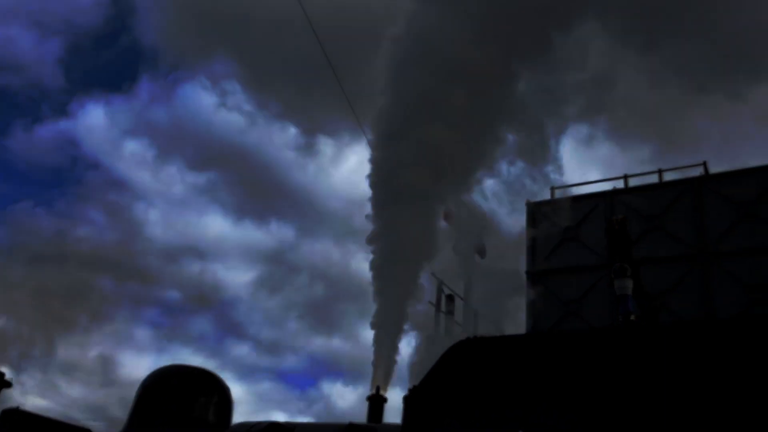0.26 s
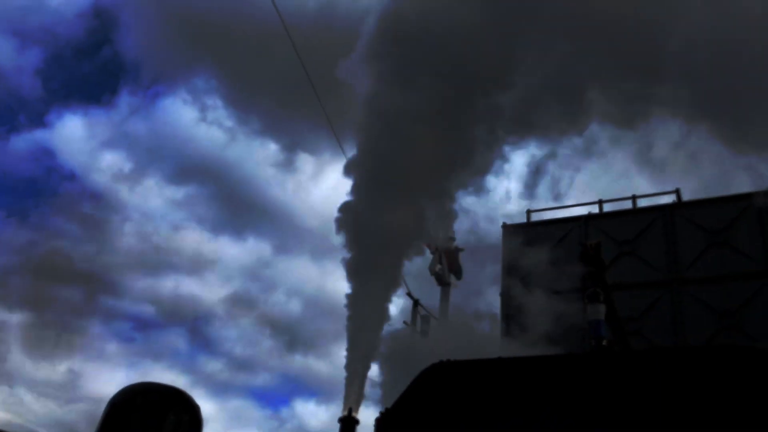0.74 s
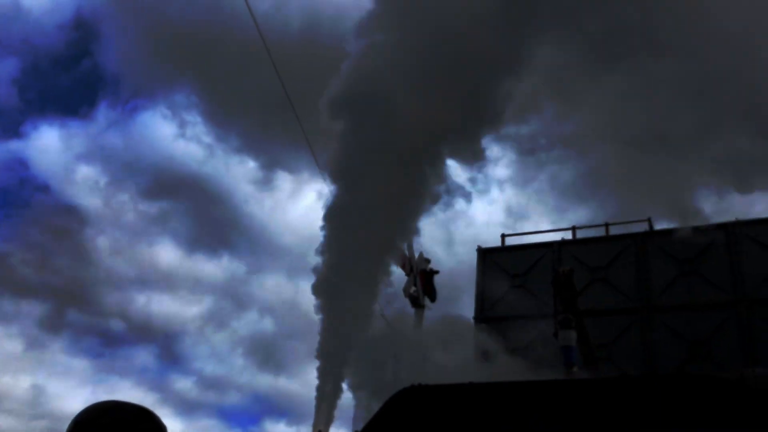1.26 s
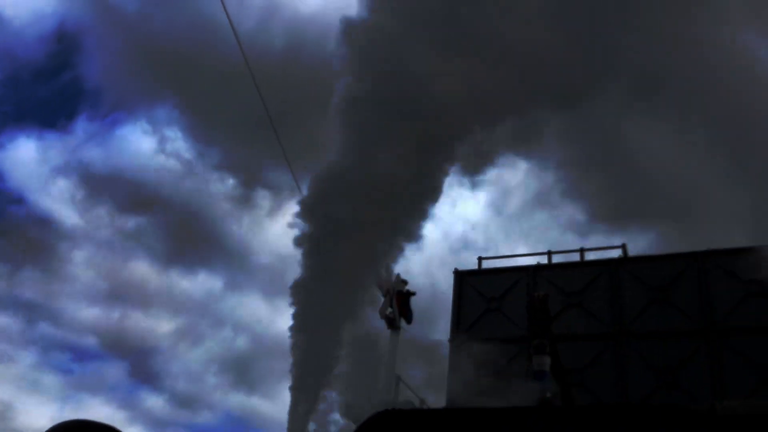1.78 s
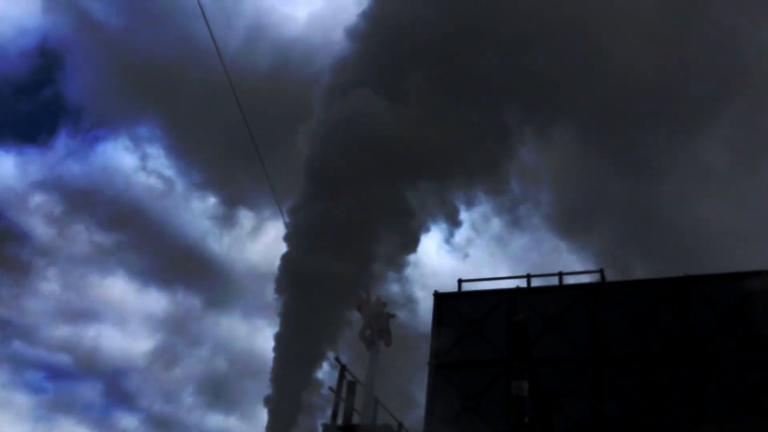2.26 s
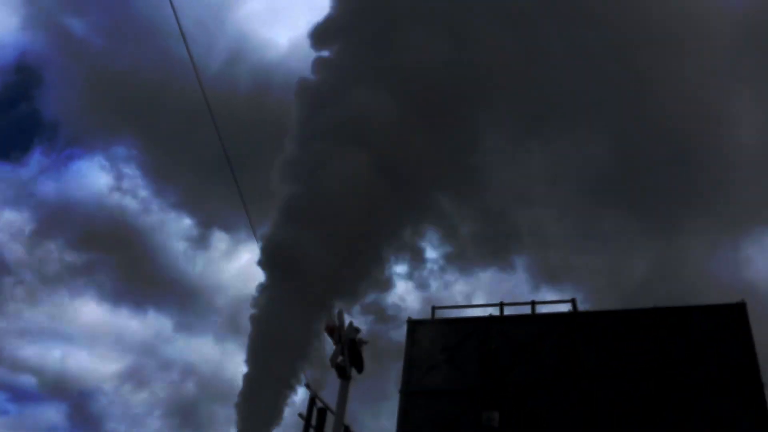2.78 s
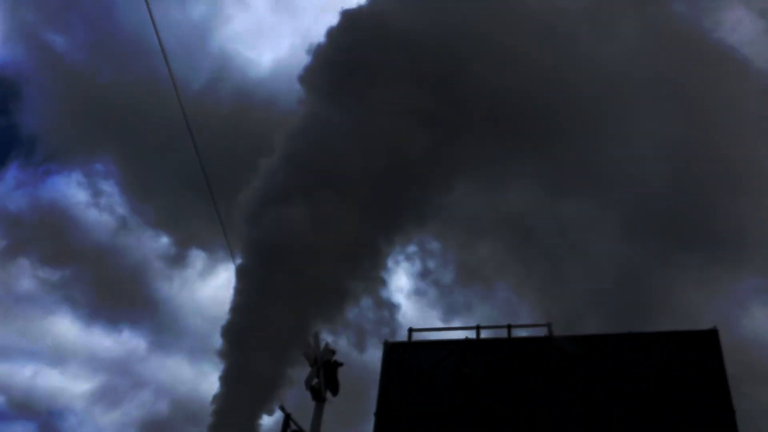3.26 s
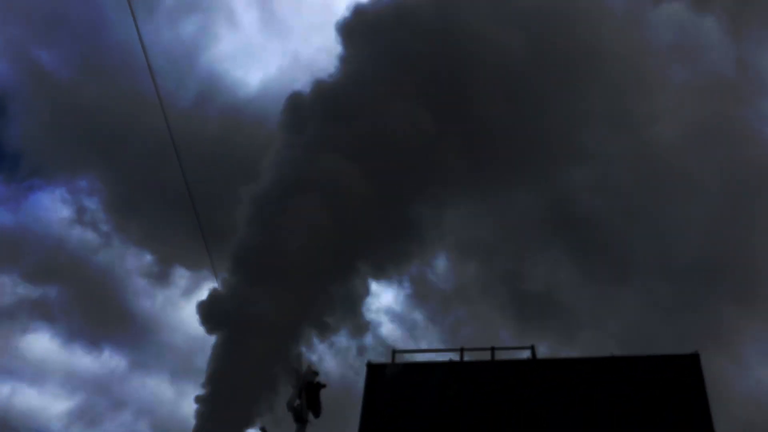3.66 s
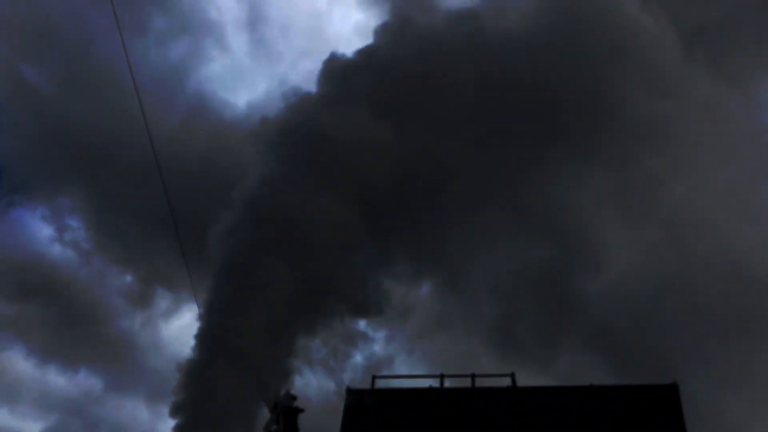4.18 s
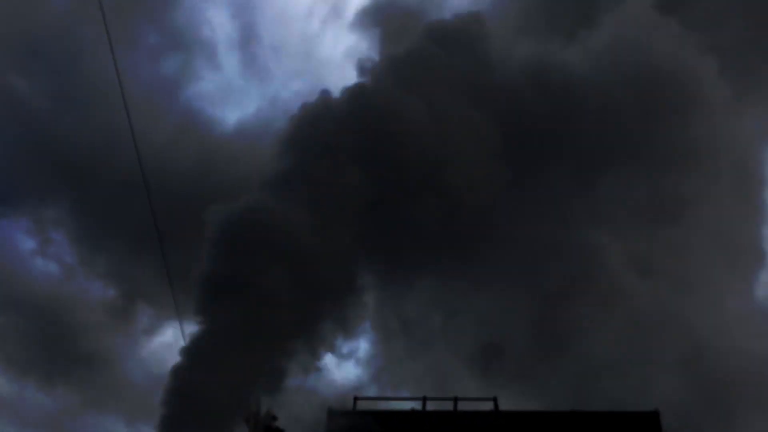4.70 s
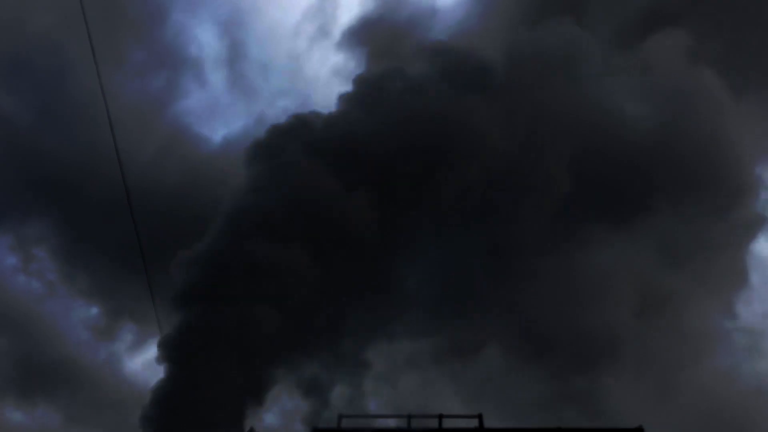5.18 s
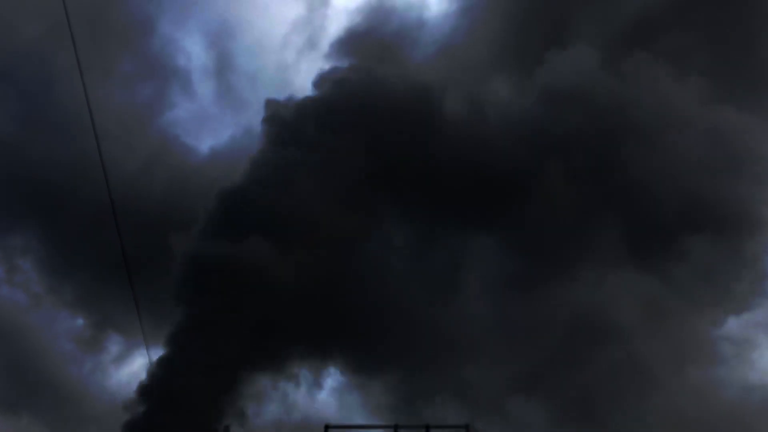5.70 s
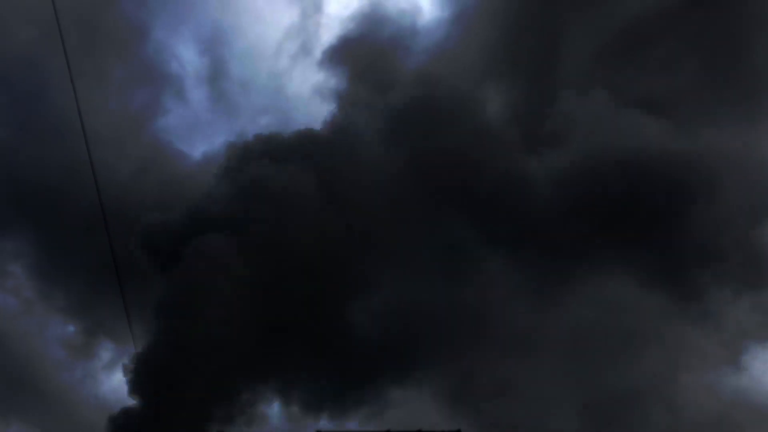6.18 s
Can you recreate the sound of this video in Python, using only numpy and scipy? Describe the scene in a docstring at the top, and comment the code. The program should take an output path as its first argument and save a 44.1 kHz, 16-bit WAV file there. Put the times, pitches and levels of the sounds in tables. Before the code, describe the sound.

A standing steam locomotive vents through its safety valves with a loud, bright hiss that runs unbroken for about six seconds, wavering slightly in the breeze. Gusts hit the microphone in irregular clusters of short, low pops and thumps, first about half a second in and most densely around the middle. The hiss dips for an instant under the hardest hits. It is heard outdoors through a single microphone.

```python
"""A loud, bright hiss, swaying in the breeze: a standing steam locomotive blows off through its safety
valves, with weak echoes off boiler, cab and platform. Gusts buffet the microphone in clusters of
low pops, each sliding down in pitch, and a limiter ducks the hiss for an instant under the hardest
ones. One microphone feeds both channels."""
import sys
import numpy as np
from scipy import signal
from scipy.fft import rfft, irfft, next_fast_len
from scipy.io import wavfile
from scipy.ndimage import uniform_filter1d

SR = 44100
rng = np.random.default_rng(int(sys.argv[2]) if len(sys.argv) > 2 else 0)


def store_wav(level_fs):
    """Save 16-bit WAV to argv[1]."""
    pcm = np.round(np.clip(np.atleast_2d(level_fs), -1, 1) * 32767)
    wavfile.write(sys.argv[1], SR, pcm.T.astype(np.int16))


N = 284445
FFT_SIZE = next_fast_len(N + SR // 2) // 2 * 2
TIME, FREQ = np.arange(N) / SR, np.fft.rfftfreq(FFT_SIZE, 1 / SR)
CUTOFF_HZ = 15850


def from_db(db):
    """Decibels to gain."""
    return 10 ** (np.asarray(db) / 20)


def colour(points):
    """Gain at every frequency from (f/Hz, level/dB) points."""
    hz, db = np.transpose(points)
    return from_db(np.interp(np.log(FREQ + 1), np.log(hz), db))


def filtered(x, response):
    """Pass a sound through a frequency response."""
    return irfft(rfft(x, FFT_SIZE) * response)[..., :N]


def noise(response):
    """Coloured noise of rms 1."""
    x = filtered(rng.standard_normal(N), response)
    return x / x.std()


def drift(per_s):
    """A random wander of spread 1 that takes a new course per_s times a second."""
    knots = rng.standard_normal(2000)
    return np.interp(TIME * per_s, np.arange(len(knots)), knots) * np.sqrt(3 / 2)


def smooth(x, seconds):
    """A triangular running mean."""
    size = max(int(seconds * SR), 1)
    return np.maximum(uniform_filter1d(uniform_filter1d(x, size), size), 0)


# Spectrum of moving air on the microphone, for breeze and pops alike: f/Hz, relative level/dB
EDDY_SPECTRUM = [(15, -29), (30, -17), (55, -0.5), (160, 1.5), (300, -1.5), (500, -2), (800, -8),
                 (1300, -15.5), (2500, -24), (8000, -47)]


def breeze(level_db=-65.0, lumpy_db=2.0, lumps_per_s=12.0):
    """Light air rumbles faintly and unevenly right on the microphone."""
    return noise(colour(EDDY_SPECTRUM)) * from_db(level_db + lumpy_db * drift(lumps_per_s))


# Distinct wind pops on the microphone, single ones and the hardest hits within gusts;
# a big eddy thumps, a small one ticks: t/s, relative level/dB, extra bass/dB
DISTINCT_POPS = [(0.31, -20, -3), (0.589, -6, -8), (0.603, -3.5, -15), (0.685, -8, -4), (0.821, -14.5, 0),
                 (1.213, -24, -1), (1.688, -22, 1), (1.788, -8.5, 7), (1.841, -5.5, 4), (2.156, -10.5, 3),
                 (2.409, -19, -7), (2.477, -20, 3), (2.572, -8.5, 7), (2.765, -19.5, 1), (2.839, -15.5, -5),
                 (3.102, -9.5, 4), (3.141, -9.5, 4), (3.513, -5.5, -7), (3.618, -9, -1), (3.674, -4.5, -9),
                 (3.684, -7, -11), (3.77, -9.5, 1), (3.809, -9, 5), (4.031, -24.5, 7), (4.117, -20.5, 0),
                 (4.716, -11, -1), (4.772, -7.5, 5), (4.862, -17, 3), (5.007, -15, -3), (5.069, -10.5, 2),
                 (5.398, -9.5, -7), (6.154, -20, 0)]
# Gusts at the microphone: start t/s, length/s, typical relative eddy level/dB, extra bass/dB
GUST_RUNS = [(0.481, 0.04, -16, 0), (0.564, 0.11, -15, -2), (1.755, 0.098, -14, -1),
             (2.132, 0.057, -21, -1), (2.526, 0.057, -16.5, -7), (2.589, 0.052, -21, -6),
             (3.078, 0.12, -14, 1), (3.521, 0.17, -12.5, 1), (3.74, 0.046, -13.5, 2), (4.72, 0.092, -22, 4),
             (4.86, 0.05, -26, 0)]


def eddies(per_s=120, jitter=.4, spread_db=2.5, bass_spread_db=2, max_per_gust=40):
    """Each gust breaks into an uneven run of eddies; these join the distinct pops in time order."""
    rows = list(DISTINCT_POPS)
    for start, length, db, bass_db in GUST_RUNS:
        late, strength, bulk = rng.standard_normal((3, max_per_gust))
        after_s = np.abs(np.arange(max_per_gust) + jitter * late) / per_s
        run = np.column_stack([start + after_s, db + spread_db * strength,
                               bass_db + bass_spread_db * bulk])
        rows += map(tuple, run[after_s < length])
    return sorted(rows)


def wind_pops(gain_db=2, bass_hz=130.0, crack_db=3.0, crack_hz=1700.0,
              flutter_db=-9.5, wake_s=0.0095, lag_cycles=1.5, lag_floor_hz=11.0):
    """Eddies push and release the diaphragm in turn; each leaves a short wake of finer flutter."""
    onset_s, level_db, bass_db = np.transpose(eddies())
    at = np.round(onset_s * SR).astype(int)
    kicks, thumps = np.zeros((2, N))
    kicks[at] = from_db(level_db + gain_db) * (-1) ** np.arange(len(at))
    thumps[at] = kicks[at] * from_db(bass_db)
    extra_bass = filtered(thumps - kicks, 1 / (1 + (FREQ / bass_hz) ** 2))
    fade = np.exp(-1 / (wake_s * SR))
    wake = np.sqrt(signal.lfilter([1 - fade], [1, -fade], kicks ** 2 + 1e-18))
    flutter = from_db(flutter_db) * wake * rng.standard_normal(N)
    # a hard eddy has a steeper front, so it cracks as well
    highpass = 1 - 1 / (1 + (FREQ / crack_hz) ** 2) ** 2
    crack = from_db(crack_db) * filtered(kicks * np.abs(kicks), highpass)
    pressure = kicks + extra_bass + crack + flutter
    # each frequency arrives about lag_cycles of its own cycles late, so a pop slides down in pitch
    slide = np.exp(-2j * np.pi * lag_cycles * np.log(FREQ + lag_floor_hz))
    spectrum = colour(EDDY_SPECTRUM)
    pulse_peak = irfft(spectrum)[0]
    return filtered(pressure, spectrum / pulse_peak * slide)


def reflections(jet, level_db=-17.0, near_s=0.000496, far_s=.011,
                wander_s=.00007, wander_per_s=2.0, count=28):
    """Echoes off nearby boiler, cab and platform; their delays drift slowly and ripple the hiss."""
    echoes = np.zeros(N)
    for delay_s in rng.uniform(near_s, far_s, count):
        emitted_s = TIME - delay_s - wander_s * drift(wander_per_s)
        echoes += np.interp(emitted_s, TIME, jet, left=0)
    return from_db(level_db) * echoes / np.sqrt(count)


# Long-term spectrum of the jet at the microphone: f/Hz, relative level/dB
JET_SPECTRUM = [(35, -35), (85, -24), (150, -14.5), (330, -11), (500, -8), (1000, -6.5), (2000, -5.5),
                (2650, -5), (3100, -2.0), (5500, 0), (8700, -0.07), (11900, -1.1), (13000, -4),
                (15800, -5.5)]
# The plume sways in the breeze, heard in the treble: t/s, relative level/dB
PLUME_SWAY = [(0.0, -19.5), (0.23, -20), (0.37, -18.5), (0.79, -19), (1.34, -20), (1.43, -21.5),
              (1.89, -19), (2.88, -20), (3.76, -20), (3.84, -18.5), (4.23, -20), (4.34, -18.5), (4.5, -20),
              (4.8, -18), (5.19, -20), (5.56, -20), (5.76, -21.5), (6.15, -19.5), (6.35, -23),
              (6.45, -19.5)]
# Highs are beamed, so they follow the sway most: f/Hz, multiple of the swing in dB
SWAY_DEPTH = [(1500, 0.041), (4000, 0.29), (9000, 0.97), (14000, 1.3)]
# The roar fades slowly while the sizzle holds: f/Hz, level slope/(dB/s)
JET_TREND = [(1500, -0.32), (4000, -0.24), (9000, 0.17), (14000, -0.2)]


def steam_jet(level_db=-19, patchy_db=0.57, patchy_per_s=4.5, churn_db=0.51, churn_per_s=60.0,
              flap_db=0.43, flap_per_s=9.0, bands=26):
    """Turbulent steam hisses from the valves; the plume sways and each band flickers by itself."""
    sway_db = np.interp(TIME, *np.transpose(PLUME_SWAY))
    sway_db = sway_db - sway_db.mean() + flap_db * drift(flap_per_s)
    turbulence = rfft(noise(colour(JET_SPECTRUM)), FFT_SIZE)
    centres_hz = np.linspace(0, CUTOFF_HZ, bands)
    hiss = np.zeros(N)
    for hz, weights in zip(centres_hz, np.eye(bands)):
        band = irfft(turbulence * np.interp(FREQ, centres_hz, weights))[:N]
        depth = np.interp(hz, *np.transpose(SWAY_DEPTH))
        trend_db = np.interp(hz, *np.transpose(JET_TREND)) * (TIME - TIME.mean())
        hiss += band * from_db(depth * sway_db + trend_db + patchy_db * drift(patchy_per_s))
    # large eddies in the jet shake all bands together
    return hiss * from_db(level_db + churn_db * drift(churn_per_s))


def scene():
    """Jet, echoes and wind reach one microphone on the platform, which feeds both channels."""
    jet = steam_jet()
    return np.tile(jet + reflections(jet) + wind_pops() + breeze(), (2, 1))


def limiter(x, threshold_db=-14.0, slope=.65, window_s=.005):
    """A fast limiter turns everything down while the level is over the threshold."""
    power = smooth(np.mean(x ** 2, axis=0), window_s)
    excess_db = np.maximum(10 * np.log10(power + 1e-12) - threshold_db, 0)
    return x * from_db(-slope * smooth(excess_db, window_s))


def record(dry):
    """After the microphone, the hardest pops are limited and the top treble is cut."""
    steep_cut = 1 / np.sqrt(1 + (FREQ / CUTOFF_HZ) ** 400)
    return filtered(limiter(dry), steep_cut)


dry = scene()
out = record(dry)
store_wav(out)
```